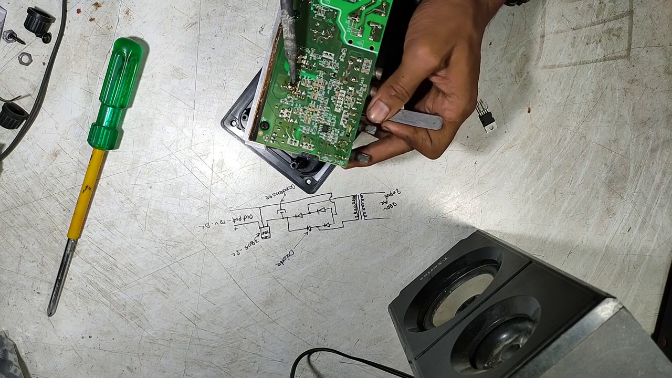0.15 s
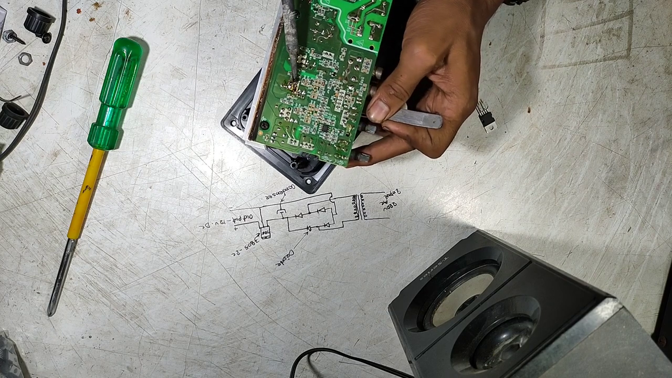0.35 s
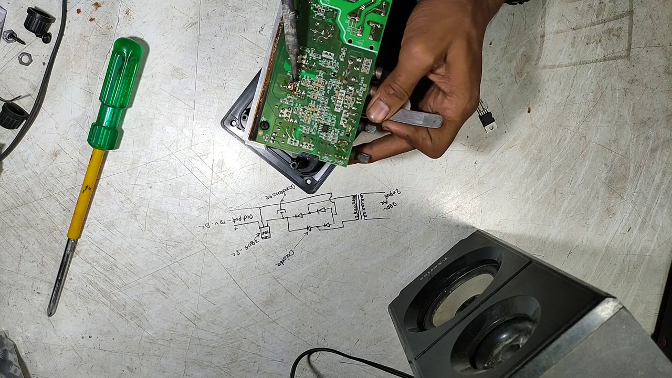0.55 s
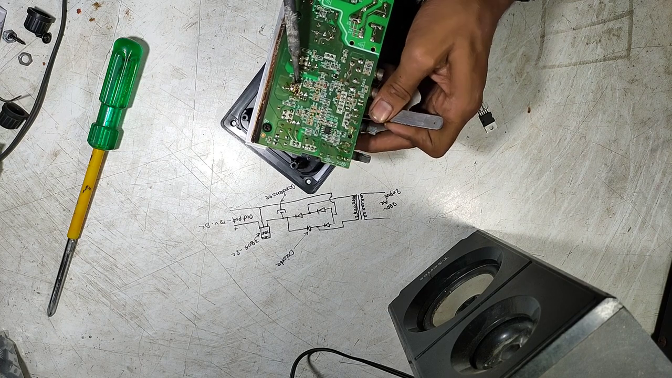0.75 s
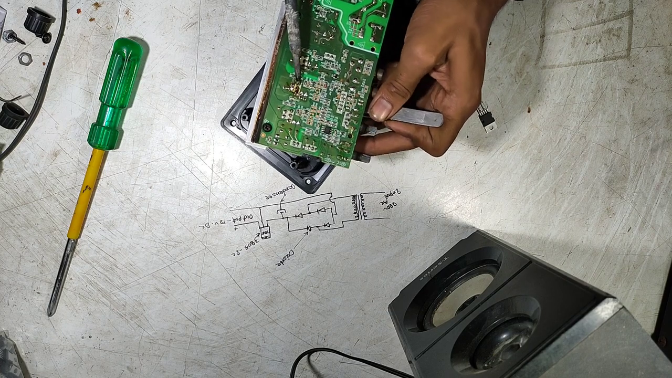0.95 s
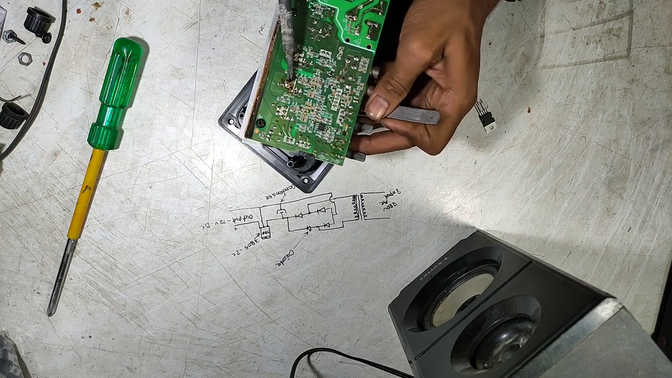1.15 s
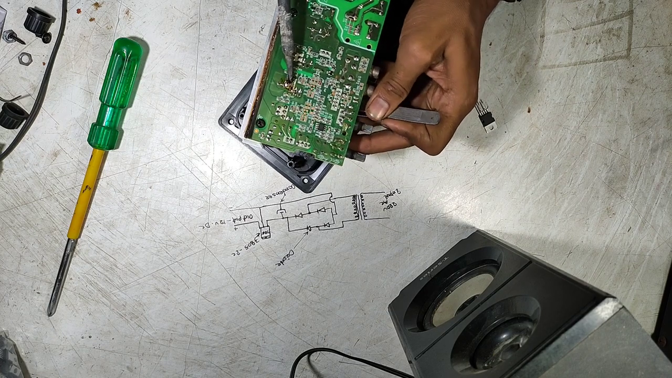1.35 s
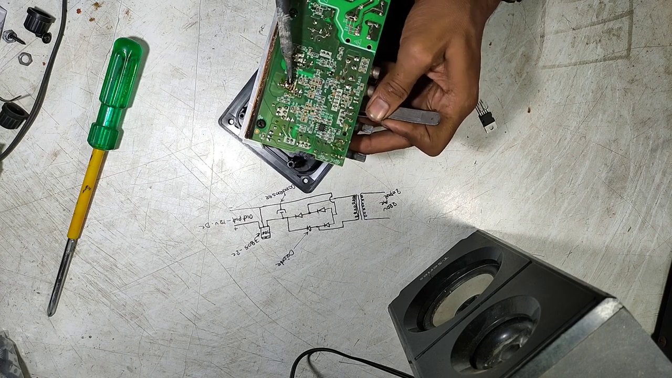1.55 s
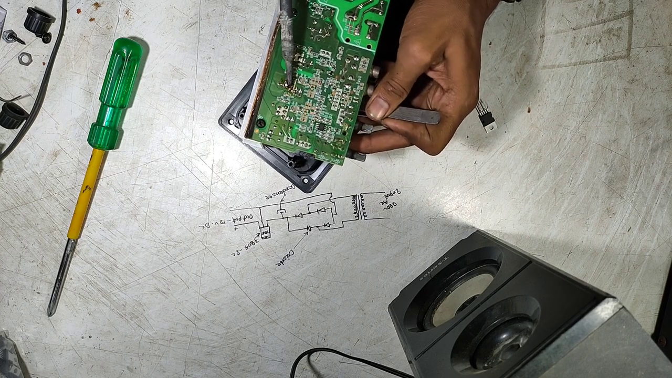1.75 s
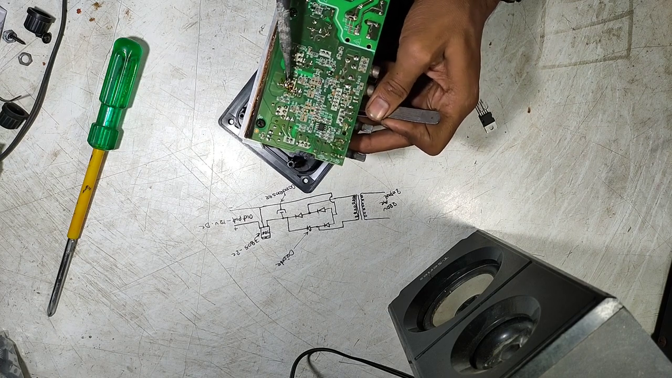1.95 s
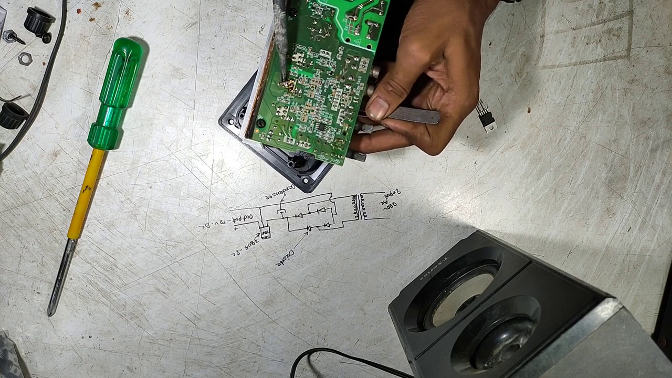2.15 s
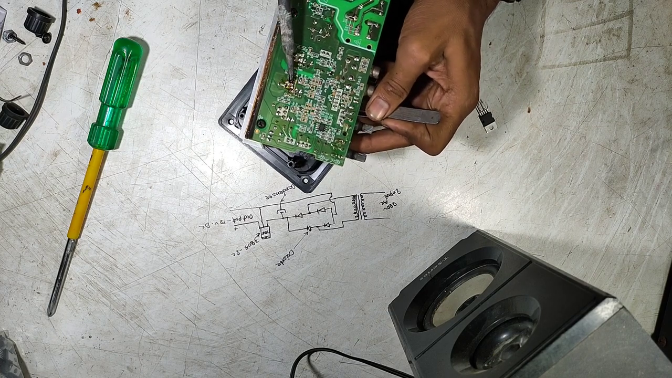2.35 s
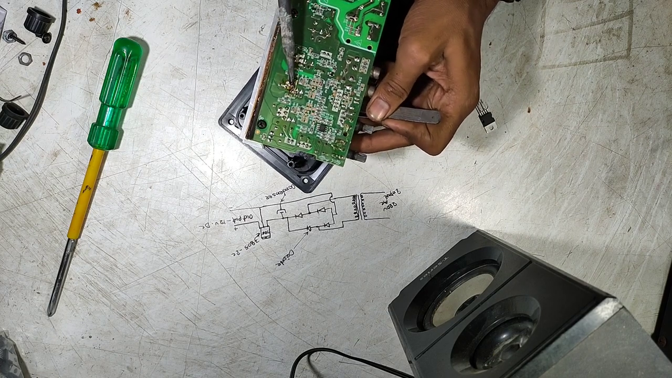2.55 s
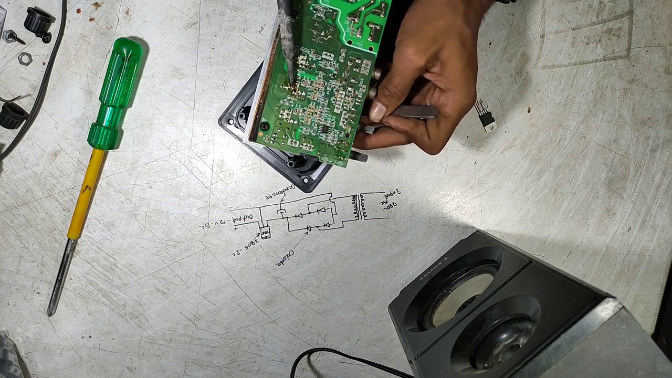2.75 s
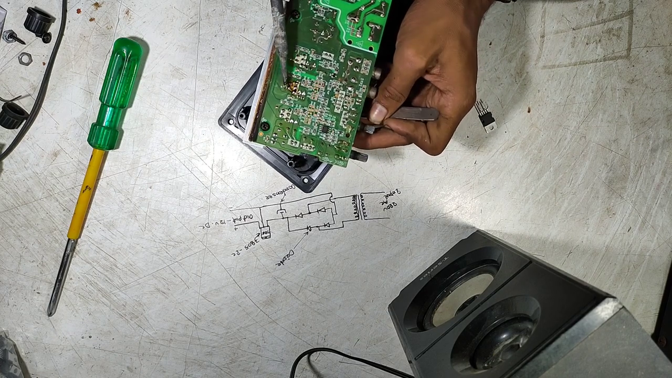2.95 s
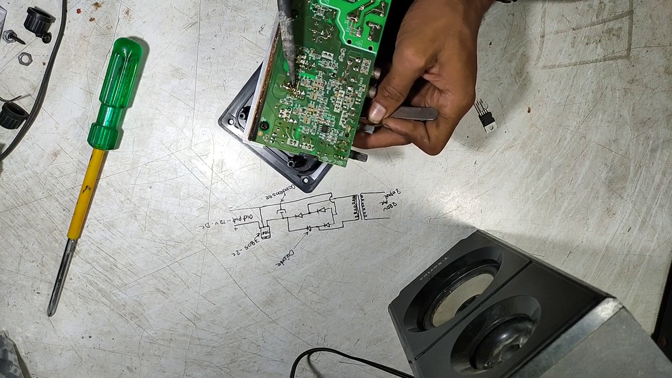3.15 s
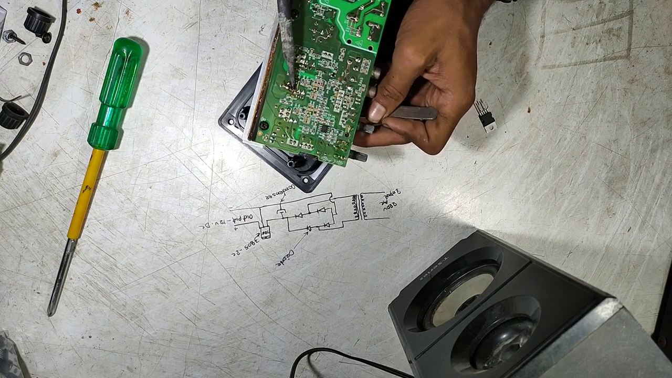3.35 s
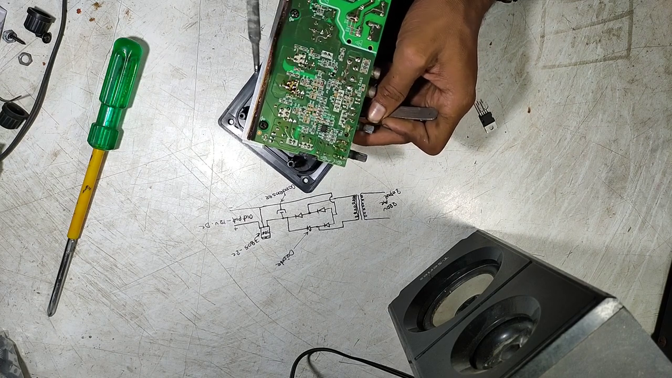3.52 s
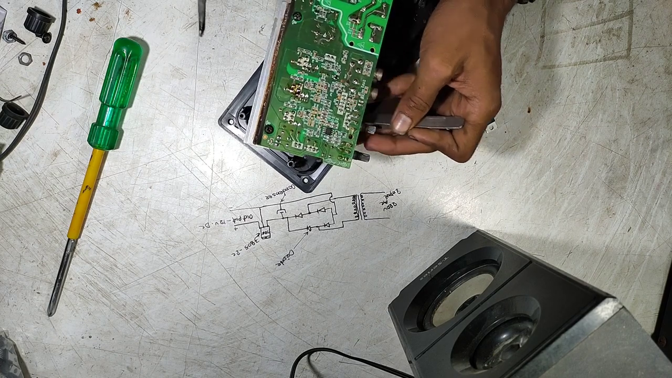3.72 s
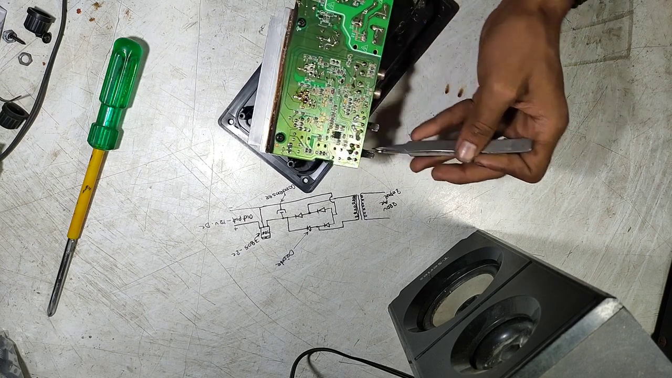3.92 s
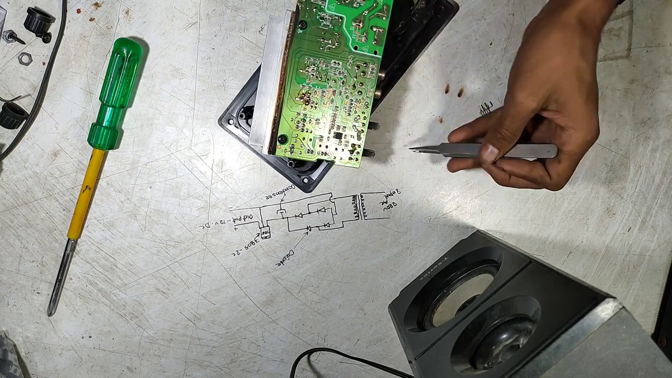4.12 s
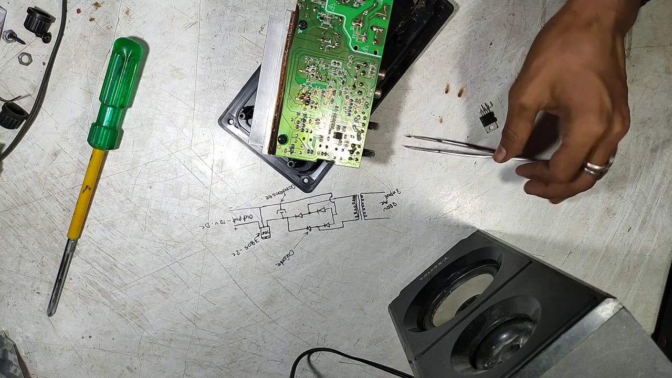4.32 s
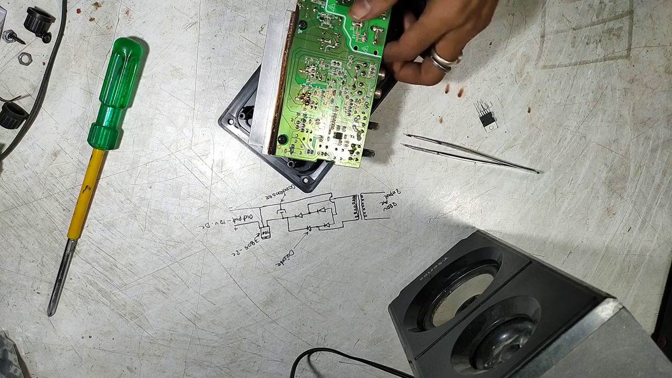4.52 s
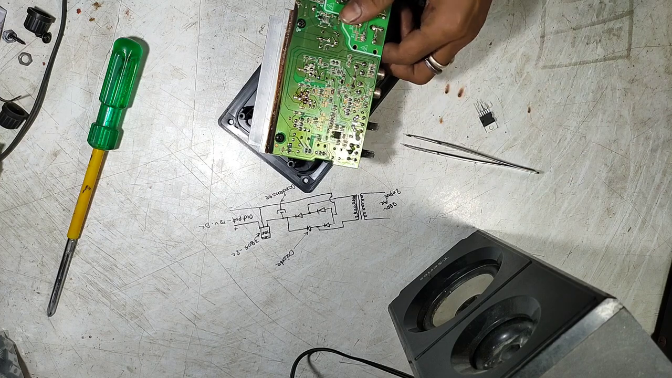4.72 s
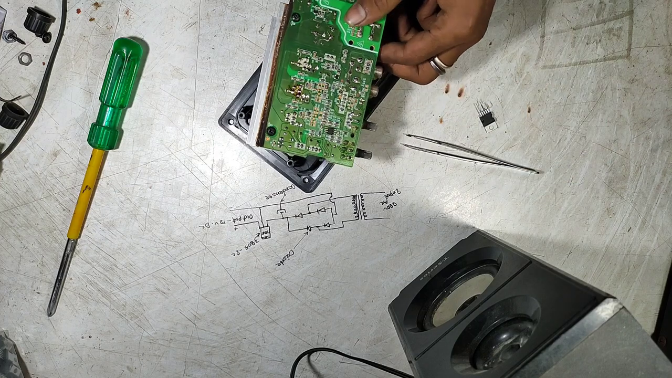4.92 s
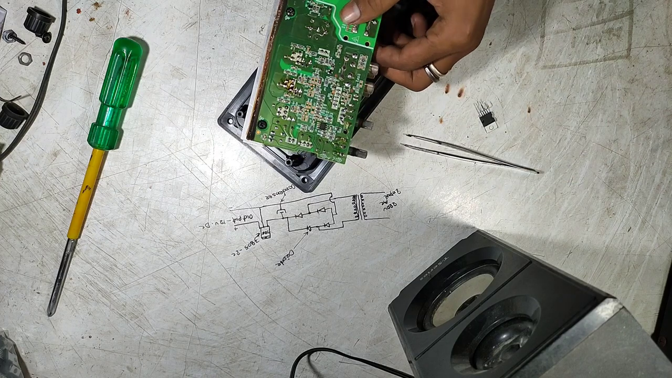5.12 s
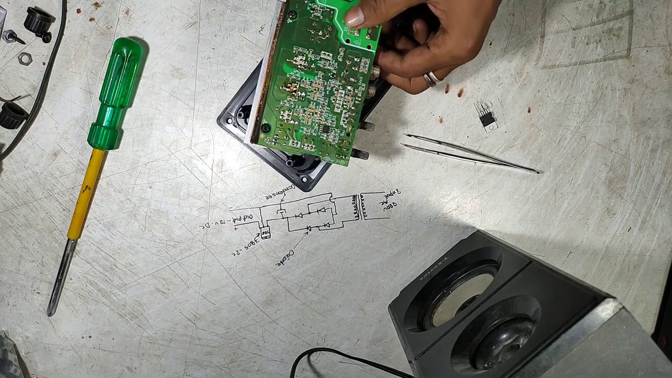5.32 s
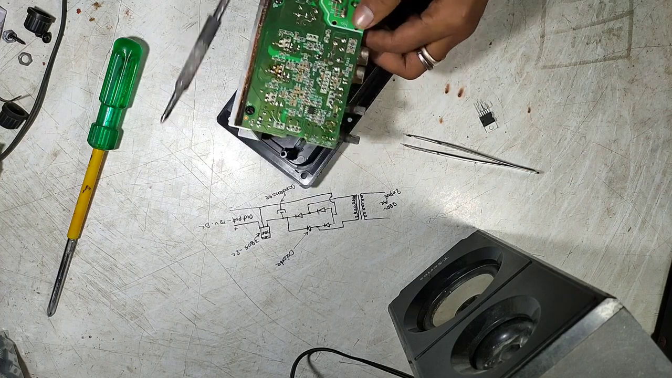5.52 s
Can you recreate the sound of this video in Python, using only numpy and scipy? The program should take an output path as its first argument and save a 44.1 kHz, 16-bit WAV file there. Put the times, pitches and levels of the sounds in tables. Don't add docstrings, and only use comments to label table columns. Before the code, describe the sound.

At a workbench, metal tips tap and scratch a circuit board with tiny squeaks, over low room rumble, finger rustle and faint hiss. A hard click comes at one second, a harsh distorted knock near 2.7. After a quieter patch, knocks resume; tweezers drop and skid with thin metallic ringing, then the board lands on its plastic tray. Close, dull microphone resting on the bench, catching low thuds.

```python
import sys
import numpy as np
from scipy import signal
from scipy.io import wavfile
from scipy.ndimage import uniform_filter1d

SR = 44100
rng = np.random.default_rng(int(sys.argv[2]) if len(sys.argv) > 2 else 0)


def amplitude_ratio(level_db):
    exponent = np.asarray(level_db, float) / 20
    return 10 ** exponent


def master_out(mix):
    frames = np.transpose(np.atleast_2d(mix))
    ceiling = np.clip(frames, -1, 1)
    pcm = np.round(ceiling * 32767).astype(np.int16)
    wavfile.write(sys.argv[1], SR, pcm)


N = 250488


def rms_one(x):
    return x / np.sqrt(np.mean(x ** 2) + 1e-20)


def in_time(rows):
    s, *columns = np.transpose(rows)
    return [np.interp(np.arange(N) / SR, s, c) for c in columns]


def stroke_curves(tables):
    gate = np.zeros(N)
    for rows in tables:
        gate[int(rows[0][0] * SR):int(rows[-1][0] * SR)] = 1
    return [uniform_filter1d(gate, size=220)] + in_time([row for rows in tables for row in rows])


def add(track, s, sound):
    at = int(round(s * SR))
    track[at:at + len(sound)] += sound[:N - at]


def drift(rate):
    r = np.exp(-80 * np.pi * rate / SR)
    steps = rng.standard_normal(N // 40 + 2002)
    slow = signal.lfilter([1], [1, -2 * r, r * r], steps)[2000:]
    return np.interp(np.arange(N) / 40, np.arange(len(slow)), rms_one(slow))


def resonate(x, hz, width_hz):
    r = np.exp(-np.pi * width_hz / SR)
    poles = [1, -2 * r * np.cos(2 * np.pi * hz / SR), r * r]
    return signal.lfilter([(1 - r * r) / 2, 0, (r * r - 1) / 2], poles, x)


def above(x, hz):
    return signal.lfilter(*signal.butter(2, hz, "high", fs=SR), x)


PORT_HZ = 4600


def below_port(x):
    return signal.sosfilt(signal.cheby2(10, 36, 1.07 * PORT_HZ, fs=SR, output="sos"), x)


def banded_noise(spectrum, low_hz, high_hz, patchy_db, rate):
    edges = np.geomspace(low_hz, high_hz, int(3 * np.log2(high_hz / low_hz)) + 2)
    white = rng.standard_normal((2, N + SR // 2))
    point_hz, point_db = np.array(spectrum).T
    out = 0
    for k, (low, high) in enumerate(zip(edges, edges[1:])):
        band_pass = signal.butter(2, [low, high], "band", fs=SR, output="sos")
        band = signal.sosfilt(band_pass, white[k % 2])[-N:]
        level_db = np.interp(np.log(low * high) / 2, np.log(point_hz), point_db)
        out = out + amplitude_ratio(level_db + patchy_db * drift(rate)) * band
    return rms_one(out)


# start_s, level_db
BUSY = [(0, 1), (.6, 1), (1.09, 6.5), (1.4, 1), (2.42, -0.5), (2.69, 3.5), (3.21, .5), (3.55, -2),
        (3.8, 7.5), (4.37, 10.5), (4.9, 5.5), (5.38, 2), (5.68, 5)]
# pitch_hz, level_db (per Hz)
ROOM_TONE = [(20, -7), (53, -15.5), (80, -18.5), (155, -29.5), (226, -29.5), (461, -42)]
RUSTLE = [(450, -6.5), (700, -6), (1600, -9.5), (2000, -10), (2600, -19), (3300, -15), (4300, -20.5),
          (5000, 0.5)]
HISS = [(4800, -9), (6300, -20.5), (8000, -19.5), (10000, -21), (13000, -29.5), (15800, -24)]
# start_s, length_s, level_db
PORT_PATCHES = [
    (1.07, .04, -66),
    (2.2, .25, -70),
    (3.43, .09, -68),
    (3.57, .09, -67),
    (5.1, .08, -68),
]
RUMBLE_DB, RUMBLE_FOLLOWS, LOAD_DB, LOAD_FOLLOWS = -33, 0.2695, -45, .8
RUSTLE_DB, RUSTLE_UNEVEN_DB, HISS_DB = -61.5, 1.5, -77
PORT_HISS_DB, PORT_HISS_HZ = -81, 4550


def hands_and_room():
    busy_db, = in_time(BUSY)
    rumble = amplitude_ratio(RUMBLE_DB + RUMBLE_FOLLOWS * busy_db) * banded_noise(ROOM_TONE, 18, 70, 1.5, 5)
    load = amplitude_ratio(LOAD_DB + LOAD_FOLLOWS * busy_db) * banded_noise(ROOM_TONE, 70, 450, 2, 9)
    fingers = below_port(banded_noise(RUSTLE, 450, 5000, 1.2, 12))
    rustle = amplitude_ratio(RUSTLE_DB + busy_db + RUSTLE_UNEVEN_DB * drift(14)) * fingers
    hiss = amplitude_ratio(HISS_DB + 0.64 * busy_db) * banded_noise(HISS, 4800, 14500, patchy_db=3.0, rate=25)
    gate, patch_db = stroke_curves([[(s, db), (s + length, db)] for s, length, db in PORT_PATCHES])
    air = resonate(rng.standard_normal(N), PORT_HISS_HZ, 500)
    air = rms_one(resonate(air, PORT_HISS_HZ, 500))
    port = (amplitude_ratio(PORT_HISS_DB + 3.0 * drift(4.2)) + gate * amplitude_ratio(patch_db)) * air
    return rumble + load + rustle + hiss + port


def struck(modes, ring_s, contact, chance, spread_db, favour_hz=None, slope_db=0, lead_db=0):
    hz, level_db, share = np.array(modes, float).T[:, :, None]
    strength, shift = chance[:2, :len(hz), None]
    if favour_hz:
        distance = np.abs(np.log2(hz / favour_hz))
        level_db = level_db - slope_db * distance
        nearest = np.argmin(np.abs(hz - favour_hz))
        others = np.arange(len(hz))[:, None] != nearest
        hz[nearest] = favour_hz
        shift, strength = shift * others, strength * others
        level_db[nearest] += lead_db
        share[nearest] *= 1 + lead_db / 8
    t60 = share * np.clip(ring_s, .006, .2)
    t = np.arange(int(t60.max() * SR)) / SR
    swing = np.sin(2 * np.pi * hz * (1 + .015 * shift) * t)
    rings = amplitude_ratio(level_db + spread_db * strength - 60 * t / t60) * swing
    sound = signal.fftconvolve(rings.sum(axis=0), contact)
    sound = above(sound, 0.58 * (favour_hz or hz[0, 0]))
    return sound / np.abs(sound).max()


# pitch_hz, level_db, ring_share (of the ring time)
BOARD = [(585, 0, 1.2), (700, -1, 1.2), (850, 0, 1.1), (1000, 0, 1.1), (1160, 0, 1.1), (1270, 0, 1),
         (1450, 0, .9), (1660, 0, 1), (1850, -1, .8), (2130, -1, .7)]
TRAY = [(2460, 0, .7), (2660, -3, .7), (2960, 0, .7), (3160, -3, .6), (3440, 0, .6), (3710, -1, .6),
        (3930, -2, .6), (4300, -2, .6)]
TIP = [(5260, -1, 0.62), (6370, 6.5, 0.11), (7090, -2.5, .3), (8190, 1, 0.34), (9400, 1.5, .3),
       (10500, -6, 0.1), (11390, -8, .3), (13480, -11, 0.47), (14000, -22.5, .25), (14000, -15.5, 0.3)]
BOARD_RING_S, TRAY_RING_S, TIP_RING_S, BLOW_DELAY_S = 0.02, 0.017, 0.02, .0012
# start_s, board_db (peak), board_hz, clack_db (tray), clack_hz (optional, where it leaves the rule)
TIP_TAPS = [(.585, -32.5, 1850, -54), (.69, -50, 584, -39, 3740), (.725, -40, 765, -43, 3750),
            (.747, -39, 730, -45), (.761, -42, 1910, -42, 3700), (.9955, -10, 1700, -16.5, 3900),
            (.997, -12, 964, -20, 3420), (1.114, -38, 1530, -31), (1.134, -24, 650, -50),
            (1.195, -26, 720, -30), (1.857, -33, 577, -41), (2.021, -40.5, 589, -46),
            (2.154, -32, 563, -36.5), (2.438, -20, 550, -19.5), (2.439, -27, 2000, -50),
            (2.463, -39, 1800, -61), (2.514, -35.5, 641, -38), (2.598, -27, 563, -39),
            (2.601, -18.5, 2220, -47), (2.649, -40.5, 616, -40), (2.684, -25, 676, -38),
            (2.71, -39, 581, -35.5), (2.713, -18, 600, -6, 3500), (2.718, -4, 1900, -11, 3460),
            (2.7235, 9, 1650, -6, 2400), (2.729, -5, 1600, -9, 3460), (2.964, -25, 1360, -38),
            (2.992, -30.5, 1470, -41), (2.955, -50, 1400, -44, 3000), (3.531, -46, 1954, -50)]
TRAY_KNOCKS = [(.02, -44, 1660, -46), (.282, -40, 807, -50), (1.613, -36, 1410, -50),
               (1.816, -23, 624, -52), (2.187, -17.5, 1710, -29), (2.825, -27.5, 653, -43),
               (2.94, -38, 1596, -50), (3.747, -26.5, 1284, -47.5), (3.787, -5.5, 1230, -14, 2500),
               (3.788, -9, 1600, -16, 4350), (3.809, -9, 1300, -18.5), (3.84, -26, 1270, -34, 2500),
               (3.893, -17, 1150, -25, 2500), (3.912, -27, 1100, -45), (3.938, -38, 940, -19.5),
               (4.047, -15, 1250, -31), (4.113, -5.5, 1500, -22, 3400), (4.121, -24.5, 587, -52),
               (4.166, -32, 1130, -53), (4.196, -19, 1300, -52), (4.254, -34, 1020, -53),
               (4.282, -18, 1010, -25, 3000), (4.631, -12, 970, -20, 3500), (4.632, -22, 2100, -26, 2460),
               (4.66, -15.5, 855, -26), (4.796, -31, 616, -47), (5.416, -9, 1450, -26, 2500),
               (5.538, -31, 1130, -57), (5.576, -36, 616, -51), (5.613, -35, 705, -51),
               (5.673, -16, 1550, -28, 3100)]
BOUNCES = [(4.357, -26, 560, -30, 3190), (4.363, -11, 1010, -24, 3030), (4.388, -15, 560, -33, 2400),
           (4.396, -19, 1750, -34, 3920), (4.407, -14, 560, -30, 2400), (4.414, -15, 1750, -33, 2400),
           (4.426, -14, 1750, -32, 2400), (4.437, -12, 1720, -22, 2780), (4.461, -6, 600, -18, 2910),
           (4.464, -9, 1150, -25, 2910), (4.475, -9, 1150, -19, 2200), (4.487, -11, 1150, -18, 2900),
           (4.503, -3, 856, -8, 4090), (4.524, -12, 570, -12, 2700), (4.537, -4, 1600, -6, 2950),
           (4.538, -6, 608, -30, 2950), (4.549, -14, 700, -24, 3000), (4.556, -6, 1250, -17, 2940),
           (4.561, -12, 1600, -24, 2940)]
SET_DOWN = [
    (4.743, -45, 563, -37, 2700),
    (4.777, -52, 1000, -46, 2800),
    (4.858, -4, 770, -5, 3880),
    (4.859, -5, 1640, -12, 2300),
    (4.885, -14.5, 700, -30, 2300),
    (4.976, -6, 678, -19, 3670),
    (4.977, -9, 1520, -18, 2670),
]
# level_db, t60_s
TAILS = [
    (-27, 0.03),
    (-59, 0.48),
]
TIP_TICK_DB, TRAY_TICK_DB, BOUNCE_TICK_DB, SET_DOWN_TICK_DB, BROAD_TICK_DB = -11, -24.5, -13, -9, -1
SOFT_CLACK_DB, SOFT_CLACK_HZ, HARD_CLACK_DB, HARD_CLACK_HZ = -13.5, 2310, -3, 3750
SNAP_DB, SNAP_BOARD_SHARE = 10.5, 0.51


def knocks():
    body, tick, t = np.zeros(N), np.zeros(N), np.arange(512) / SR
    kinds = ((TIP_TAPS, TIP_TICK_DB), (TRAY_KNOCKS, TRAY_TICK_DB),
             (BOUNCES, BOUNCE_TICK_DB), (SET_DOWN, SET_DOWN_TICK_DB))
    blows = [(row[3] + under_db, *row) for rows, under_db in kinds for row in rows]
    rattles, chances = rng.standard_normal((120, 512)), rng.standard_normal((120, 3, 2, 10))
    for (tick_db, s, board_db, board_hz, clack_db, *own), rattle, chance in zip(blows, rattles, chances):
        clack_hz = np.interp(clack_db - board_db, [SOFT_CLACK_DB, HARD_CLACK_DB], [SOFT_CLACK_HZ, HARD_CLACK_HZ])
        if own:
            clack_hz = own[0]
        contact = 0.08 * rattle * np.exp(-t / 0.00086)
        contact[0] = 1
        s = s + BLOW_DELAY_S
        board = struck(BOARD, BOARD_RING_S, contact, chance[0], 2.5, board_hz, slope_db=14, lead_db=4)
        add(body, s, amplitude_ratio(board_db + 1.5) * board)
        clack = struck(TRAY, TRAY_RING_S, contact, chance[1], 2, clack_hz, slope_db=12, lead_db=2)
        add(body, s, amplitude_ratio(clack_db + 3) * clack)
        crack = signal.lfilter([.2, -.2], [1, -1.72, .735], contact)
        add(body, s, amplitude_ratio(board_db + 1.5) * above(crack, 0.36 * board_hz))
        snap = signal.lfilter([1, -1], [1, -.82], contact)
        snap_db = SNAP_DB + clack_db + SNAP_BOARD_SHARE * (board_db - clack_db)
        add(body, s, amplitude_ratio(snap_db) * above(snap, 0.399 * board_hz))
        add(tick, s, amplitude_ratio(tick_db + 6) * struck(TIP, TIP_RING_S, contact, chance[2], 3))
        add(tick, s, amplitude_ratio(tick_db + 6 + BROAD_TICK_DB) * above(contact, 4800))
    t = np.arange(SR // 2) / SR
    tail = rng.standard_normal(len(t)) * sum(amplitude_ratio(db - 60 * t / t60) for db, t60 in TAILS)
    dull_tail = signal.lfilter([.5], [1, -.55], tail)
    body = body + signal.fftconvolve(body, dull_tail)[:N]
    return below_port(body) + tick + .5 * signal.fftconvolve(tick, tail)[:N]


# pitch_hz, level_db, ring_share (of the ring time)
BENCH = [(62, -4, 1.1), (90, 0, 1.2), (125, -3, .9), (155, -2, .9), (185, -1, .8), (258, -1, .7),
         (338, -1, .6), (430, -2, .45)]
BENCH_RING_S = 0.062
# start_s, peak_db, pitch_hz (strongest)
THUDS = [(.021, -35.5, 205), (0.481, -30, 260), (.574, -26, 156), (0.688, -29.5, 90), (0.875, -28, 330),
         (1.002, -15, 153), (1.128, -22, 110), (1.759, -22.5, 78.1), (1.815, -17.5, 342),
         (2.185, -22.5, 176), (2.437, -15.5, 209), (2.471, -21, 127), (2.598, -13, 214), (2.714, -9, 71.4),
         (2.726, -15, 370), (2.752, -9, 75.3), (3.836, -20, 262), (3.895, -26, 115), (3.94, -17, 86.6),
         (4.044, -19.5, 88.8), (4.112, -16, 258), (4.282, -20.5, 325), (4.363, -24, 400), (4.388, -22, 380),
         (4.407, -18, 420), (4.437, -22, 380), (4.462, -23, 330), (4.538, -19, 432), (4.629, -17, 177),
         (4.86, -9, 85.4), (4.882, -8, 171), (4.977, -12, 110.3), (4.99, -17, 86.1), (5.418, -22.5, 140.7),
         (5.671, -34, 219)]


def thuds():
    out, t = np.zeros(N), np.arange(1600) / SR
    rocking, chances = rng.standard_normal((40, 1600)), rng.standard_normal((40, 2, 10))
    for (s, peak_db, hz), rock, chance in zip(THUDS, rocking, chances):
        contact = 0.032 * rock * np.exp(-t / 0.035)
        contact[0] = 1
        soft = np.convolve(contact, np.hanning(40))
        add(out, s, -amplitude_ratio(peak_db) * struck(BENCH, BENCH_RING_S, soft, chance, 3, hz, slope_db=7))
    return out


TIP_SWING = 1.1


def swells(rows, rise_db, fall_db):
    tables = []
    for s, length, share, board_db, tip_db in rows:
        share = np.clip(share, .02, .98)
        drops = ((0, rise_db * share), (share, 0), (1, fall_db * (1 - share)))
        tables.append([(s + at * length, board_db - drop, tip_db - TIP_SWING * drop) for at, drop in drops])
    return tables


# start_s, length_s, peak_share (of the length before the peak), board_db, tip_db
SCRATCHES = [(.45, 0.03, .5, -49, -50), (.478, 0.036, 1, -32, -39), (.575, 0.024, 0.36, -41, -51.5),
             (.818, .03, .3, -52, -64), (.85, .018, .4, -47, -57), (.873, .055, .6, -43, -53),
             (.93, .064, .5, -49, -53), (1.041, 0.026, 0.4, -35, -45), (1.32, 0.069, 0.22, -47, -57),
             (1.455, 0.027, .6, -47, -56), (1.757, .018, 0.59, -42, -56), (1.783, 0.032, 0.46, -48, -57),
             (1.917, 0.048, 0.46, -29.5, -37.5), (2.462, 0.029, .05, -37, -56),
             (2.6, 0.029, 0.04, -30.5, -48), (3.135, .035, .3, -60, -75), (3.225, .035, .5, -56, -78),
             (3.267, .02, .4, -57, -78), (3.318, .012, .4, -55, -74), (3.38, .045, .2, -50, -64),
             (3.44, .045, .7, -52, -70), (3.523, .025, .4, -48, -64)]
DRAGS = [(.685, .105, 0.66, -54, -65), (1.1, 0.056, 0.6, -38, -53), (1.82, 0.026, 0.15, -46, -67),
         (2.775, .06, .3, -50.5, -65.5), (2.925, 0.086, 0.57, -57, -69), (3.69, .095, 0.96, -45.5, -66.5),
         (3.79, 0.171, 0.05, -39.5, -66), (4.34, .118, .2, -35, -55), (4.461, .108, .05, -26, -39),
         (4.635, 0.06, 0.14, -44, -78), (5.45, .07, .5, -50, -71), (5.522, .076, .2, -45, -69),
         (5.6, .072, .3, -45, -66)]
SKIDS = [(1.0, 0.03, .05, -28, -54.5), (2.19, .04, .05, -42, -55.5), (2.728, 0.041, 0.029, -16.5, -33),
         (4.285, 0.023, .05, -30, -52), (4.356, 0.024, 0.4, -27, -44), (4.389, .016, .1, -28, -46),
         (4.408, .017, .1, -27, -45), (4.426, .026, .4, -28, -51), (4.462, .012, .1, -18, -38),
         (4.475, .006, .1, -22, -22), (4.482, .021, .3, -22, -36), (4.505, .018, .05, -15, -34),
         (4.525, .012, .1, -18, -34), (4.539, .016, .05, -16, -36), (4.556, .012, .3, -17, -40),
         (4.888, 0.033, 0.032, -29, -54), (4.985, 0.028, 0.041, -29, -70)]
SCRATCH_RISE_DB, SCRATCH_FALL_DB, SKID_RISE_DB, SKID_FALL_DB, DRAG_RISE_DB, DRAG_FALL_DB = 18.5, 23, 27, 19, 15.5, 0
# start_s, length_s, slips_hz
CHATTERS = [
    (0.874, 0.037, 356.5),
    (1.918, 0.041, 361.5),
]
CHATTER_SIZE, CHATTER_RANDOM = 8.0, .7
# pitch_hz, level_db (per Hz)
RUB = [(250, -2), (500, 0), (1000, -2), (1700, -2), (2400, -7), (3200, -9), (4200, -11), (4800, -14)]


def strokes():
    happens = rng.random((2, N)) < 7000 / SR
    slips = happens * amplitude_ratio(3.0 * rng.exponential(1, (2, N))) * rng.choice([-1, 1], (2, N))
    for s, length, rate_hz in CHATTERS:
        slips[:, int(s * SR):int((s + length) * SR)] *= CHATTER_RANDOM
        slips[:, ((s + np.arange(0, length, 1 / rate_hz)) * SR).astype(int)] = CHATTER_SIZE

    ringing = 0
    for k, (hz, db, share) in enumerate(BOARD + TRAY):
        level_db = db - 4 * np.log2(hz / 1000) + 4 * drift(10)
        ringing = ringing + (-1) ** k * amplitude_ratio(level_db) * resonate(slips[0], hz, 55 / share)
    rub = banded_noise(RUB, 250, 4800, 3, 25)
    heavy = rms_one(below_port(.85 * rms_one(ringing) + .55 * rub))
    light = rms_one(signal.sosfilt(signal.butter(2, 1500, "high", fs=SR, output="sos"), heavy))
    light = rms_one(.6 * light + 2.2 * resonate(light, 2000, 550) + 1.8 * resonate(light, 3850, 900))
    dragged = rms_one(signal.lfilter([1], [1, -.7], heavy))
    tip = rms_one(sum(amplitude_ratio(db + 6 * drift(25)) * resonate(slips[1], hz, hz / 12) for hz, db, _ in TIP))

    out = 0
    for tables, board, uneven_db in ((swells(SCRATCHES, SCRATCH_RISE_DB, SCRATCH_FALL_DB), light, 1.6),
                                     (swells(SKIDS, SKID_RISE_DB, SKID_FALL_DB), heavy, 3.2),
                                     (swells(DRAGS, DRAG_RISE_DB, DRAG_FALL_DB), dragged, 3.0)):
        gate, board_db, tip_db = stroke_curves(tables)
        uneven = amplitude_ratio(uneven_db * drift(180))
        out = out + gate * uneven * (amplitude_ratio(board_db) * board + amplitude_ratio(tip_db) * tip)
    return out


# start_s, length_s, first_hz, last_hz, level_db
SQUEAKS = [(0.46, 0.011, 10500, 10500, -42), (.48, 0.022, 7970, 8600, -34), (.689, .009, 8500, 8400, -52),
           (.724, .007, 8420, 8400, -56), (.744, .009, 8450, 8450, -53), (.76, .006, 8500, 8500, -57),
           (.772, .008, 8500, 8400, -60), (.9, 0.064, 7600, 6850, -58), (1.118, 0.018, 7460, 7640, -45.5),
           (1.175, 0.032, 7860, 9700, -53), (1.209, 0.022, 9900, 8500, -52),
           (1.265, 0.016, 9650, 8250, -61), (1.317, 0.013, 9900, 8740, -44),
           (1.527, 0.0145, 8700, 9400, -62.5), (1.956, 0.012, 8950, 10300, -38),
           (2.964, 0.012, 9400, 9730, -59), (3.038, .012, 11400, 11400, -58)]
WHISTLES = [
    (.947, .016, 3300, 3280, -50),
    (.966, .02, 2700, 2700, -56),
    (3.03, .028, 11400, 11400, -57),
    (5.465, .025, 6250, 6400, -69),
    (5.53, .03, 6500, 6700, -69),
    (5.58, .035, 6950, 7000, -69),
]
SQUEAK_EDGE_DB = 1.5


def squeaks(rows, blur_hz):
    glides = []
    for s, length, first_hz, last_hz, db in rows:
        glides.append([(s, first_hz, db - SQUEAK_EDGE_DB),
                       (s + length / 2, (first_hz + last_hz) / 2, db),
                       (s + length, last_hz, db - SQUEAK_EDGE_DB)])
    gate, hz, level_db = stroke_curves(glides)
    blur = signal.sosfilt(signal.butter(2, blur_hz, fs=SR, output="sos"), rng.standard_normal((2, N)))
    turn = 2 * np.pi * np.cumsum(hz * (1 + 0.008 * drift(60))) / SR
    band = rms_one(blur[0] * np.sin(turn) + blur[1] * np.cos(turn))
    return gate * amplitude_ratio(level_db + 1.0 * drift(63)) * band


# pitch_hz, level_db (against the clack of a bounce), t60_s
TWEEZERS = [
    (1750, -5, .045),
    (2945, -6, .04),
    (4225, -11, .045),
]


def tweezers():
    out, t = np.zeros(N), np.arange(SR // 8) / SR
    for row, chance in zip(BOUNCES, rng.standard_normal((40, len(TWEEZERS)))):
        start_s, clack_db = row[0] + BLOW_DELAY_S, row[3]
        for (hz, db, t60), luck in zip(TWEEZERS, chance):
            level_db = clack_db + db - 6 + 3 * luck - 60 * t / t60
            add(out, start_s, amplitude_ratio(level_db) * np.sin(2 * np.pi * hz * t))
    return out


def scene():
    tip = strokes() + squeaks(SQUEAKS, blur_hz=420) + squeaks(WHISTLES, blur_hz=70)
    return (hands_and_room() + knocks() + thuds() + tip + tweezers())[None]


def band_limit(x):
    return signal.sosfilt(signal.butter(12, 15610, fs=SR, output="sos"), x)


def record(dry):
    overloaded = np.clip(dry, -1, 1)
    cut = signal.sosfilt(signal.cheby2(10, 50, 15900, fs=SR, output="sos"), overloaded)
    return band_limit(np.clip(cut, -1, 1))


dry = scene()
out = record(dry)
master_out(out)
```